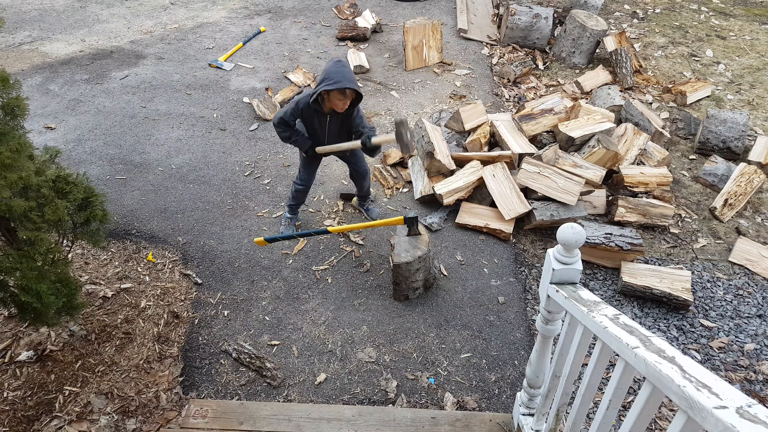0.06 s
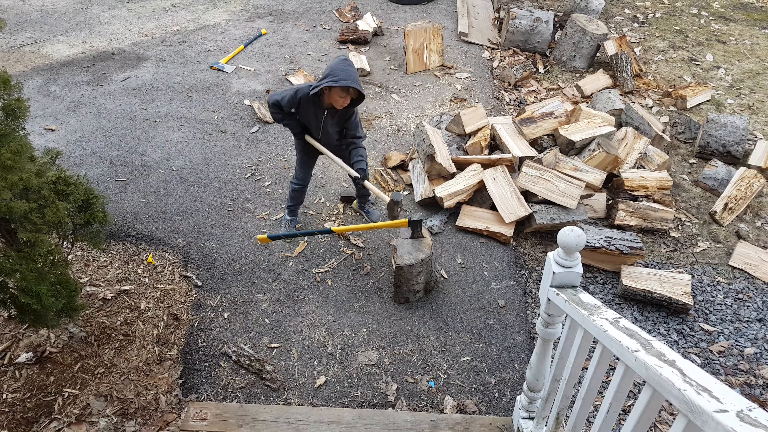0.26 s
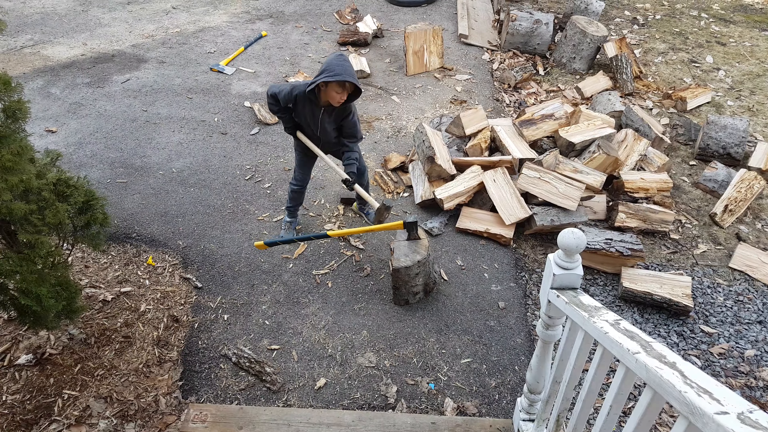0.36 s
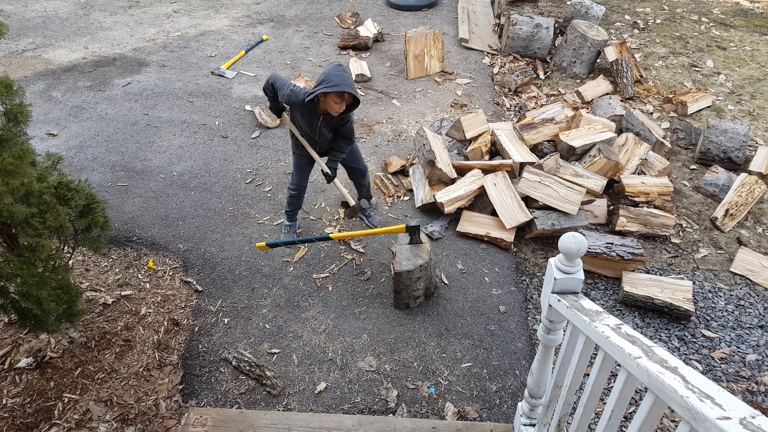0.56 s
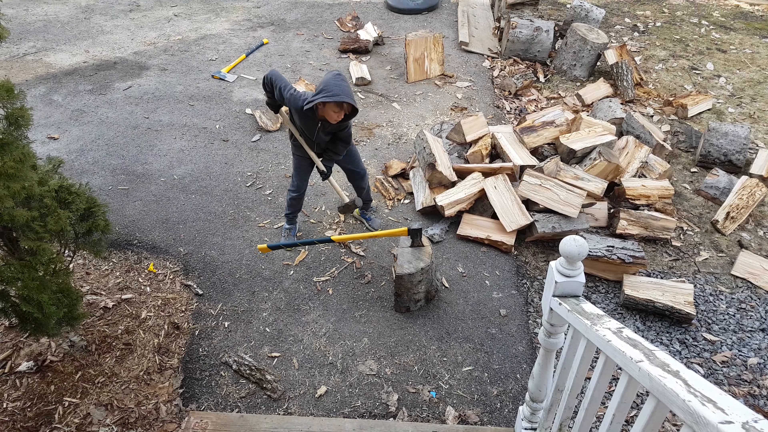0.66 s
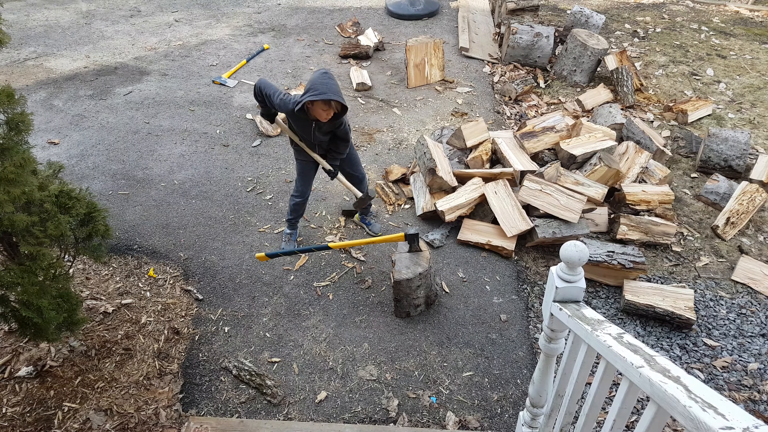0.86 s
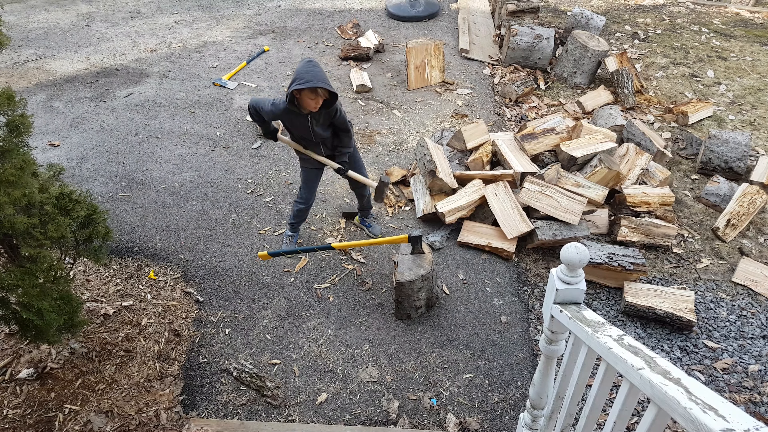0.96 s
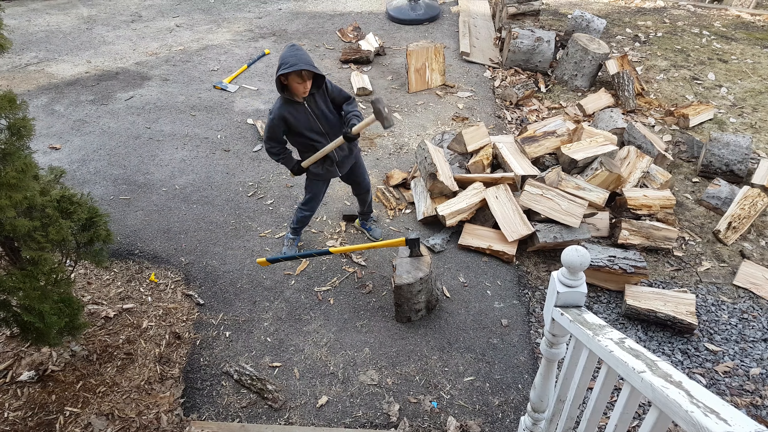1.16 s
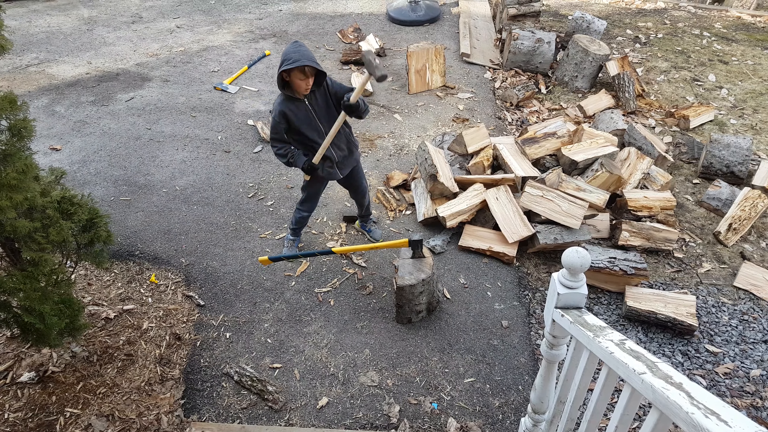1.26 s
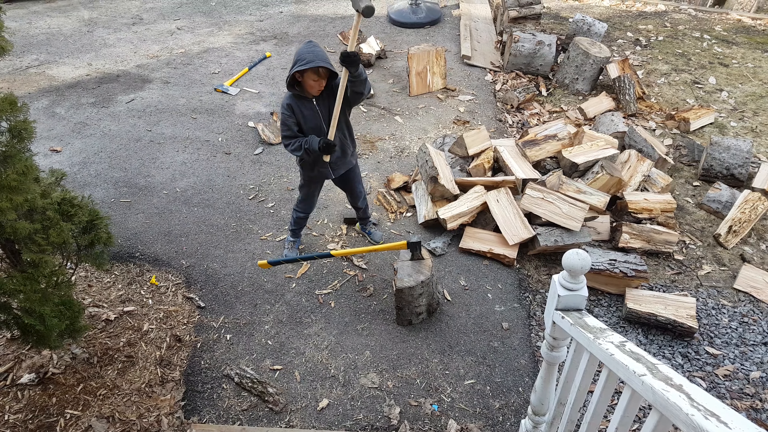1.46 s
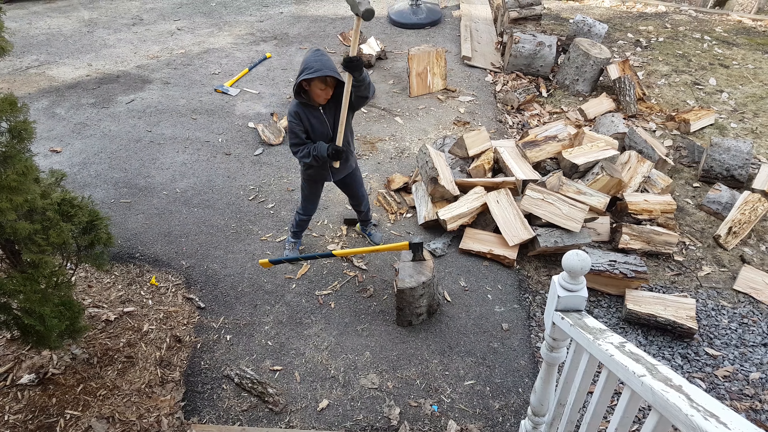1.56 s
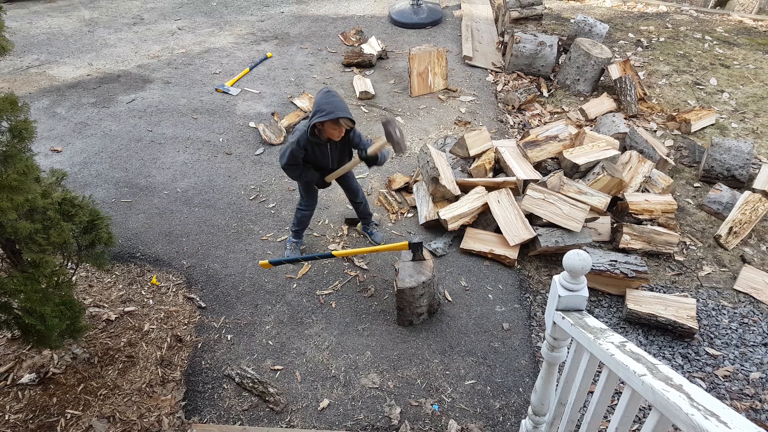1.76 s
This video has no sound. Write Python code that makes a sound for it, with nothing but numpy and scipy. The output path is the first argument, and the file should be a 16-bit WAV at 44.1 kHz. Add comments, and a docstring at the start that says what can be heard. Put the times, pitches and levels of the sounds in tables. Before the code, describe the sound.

One hard sledgehammer blow lands on a metal wedge close by in a quiet yard. The steel rings on a thin high note, the log thuds, and a faint echo fades under a few dull bumps.

```python
"""On a driveway beside a woodpile, a sledgehammer strikes a steel wedge set in a log, once.
The impact excites free vibration: the steel cracks and sings on one high note, the log thumps and clanks.
Nearby walls reflect the blow, the woodpile scatters it and the yard reverberates faintly.
A few soft bumps and ticks follow over a quiet outdoor background."""
import sys
import numpy as np
from scipy import signal
from scipy.fft import rfft, irfft, next_fast_len
from scipy.io import wavfile
from scipy.ndimage import map_coordinates

SR = 44100
rng = np.random.default_rng(int(sys.argv[2]) if len(sys.argv) > 2 else 0)


def digitize_waveform(pressure):
    """Quantize a signal to 16-bit integers and store it at the path in sys.argv[1].

    Rows of a 2-D input are taken as channels; values are limited to [-1, 1].
    """
    field = np.atleast_2d(pressure).T
    bounded = np.clip(field, -1, 1)
    quanta = np.round(bounded * 32767).astype(np.int16)
    wavfile.write(sys.argv[1], SR, quanta)


N = 79380
BLOW_S = .2094


def amp(db):
    return 10 ** (np.asarray(db) / 20)

def unit_rms(x):
    return x / np.sqrt(np.mean(x ** 2) + 1e-20)

def along(points, hz):
    """Interpolation of (f/Hz, value) points on a logarithmic frequency axis."""
    f, v = np.transpose(points)
    return np.interp(np.log(hz + 1), np.log(f + 1), v)

def envelope(points):
    """Gain per sample from (t/s, level/dB) points."""
    return amp(np.interp(np.arange(N) / SR, *np.transpose(points)))

def since(s):
    return np.maximum(np.arange(N) / SR - s, 0)

def fade(t, t60, attack_s):
    """Damping: a rise, then exponential decay by 60 dB in t60 seconds."""
    return (1 - np.exp(-t / attack_s)) * np.exp(-np.log(1000) * t / t60)

def push(s, hz, swell_s):
    """Heavily damped motion: one low push of a massive body."""
    t = since(s)
    return np.sin(2 * np.pi * hz * t) * (t / swell_s * np.exp(1 - t / swell_s)) ** 2

def wobble(rate):
    """Smooth random modulation, rate knots a second."""
    return map_coordinates(rng.standard_normal(N), [np.arange(N) * rate / SR])

def filtered(x, response):
    """Linear filtering: the spectrum of x times a frequency response."""
    m = next_fast_len(N + SR // 4)
    return irfft(rfft(x, m) * response(np.fft.rfftfreq(m, 1 / SR)), m)[..., :N]

def noise(spectrum, coherence):
    """Partial coherence: independent mid and side noise mix to coloured stereo of rms 1."""
    def response(hz):
        angle = np.arccos(np.clip(along(coherence, hz), -1, 1)) / 2
        return amp(along(spectrum, hz)) * [np.cos(angle), np.sin(angle)]
    mid, side = filtered(rng.standard_normal((2, N)), response)
    return unit_rms(np.array([mid + side, mid - side]))


# spectra of the hush and the rumble (f/Hz, relative level/dB)
HUSH_SPECTRUM = [(25, -12.5), (60, -13), (92, -6), (130, -13), (200, -10), (340, -0.5), (390, -8.5),
                 (460, -0.5), (560, -4), (850, -4), (1280, -12.5), (1520, -9), (1900, -16.5), (3600, -26),
                 (6000, -32), (9000, -36), (15000, -32.5)]
RUMBLE_SPECTRUM = [(20, -5.5), (45, -5.5), (90, 0), (250, -5.5), (500, -15), (2000, -44)]
# ducking of the hush, swell of the rumble (t/s, level/dB)
HUSH_DUCKING = [(0, -54.5), (.2, -55.5), (.5, -63.5), (.8, -62.5), (1.0, -59.5), (1.3, -57), (1.8, -57)]
RUMBLE_LEVEL = [(0, -60.5), (.06, -53.5), (.2, -62), (.42, -58.5), (.6, -67), (1.0, -77), (1.8, -74)]
# left-right likeness of both (f/Hz, coherence)
AIR_COHERENCE = [(50, .88), (200, 0.79), (350, .73), (700, .05), (1400, -0.27), (2800, .1), (5000, -.1),
                 (12000, 0)]
def background(flutter_db=-1.36):
    """Ambient noise: the hush ducks about 8 dB after the blow, as if by a recorder's gain control,
    then recovers; a low rumble swells and fades."""
    hush = envelope(HUSH_DUCKING) * amp(flutter_db * wobble(14)) * noise(HUSH_SPECTRUM, AIR_COHERENCE)
    return hush + envelope(RUMBLE_LEVEL) * noise(RUMBLE_SPECTRUM, AIR_COHERENCE)


# faint ticks (t/s, level/dB, centre f/Hz, width/octaves, T60/s)
TICK_BANDS = [(.669, -67, 14500, 0.073, 0.06), (1.569, -61.5, 14700, .08, .06),
              (1.643, -60, 2800, 0.48, 0.068), (1.655, -62, 2250, 0.12, 0.11)]
def ticks():
    """Band-limited transients: each tick is a decaying burst of narrow-band noise."""
    out = np.zeros((2, N))
    for s, db, centre_hz, octaves, t60 in TICK_BANDS:
        bell = lambda hz: np.exp(-.5 * (np.log2((hz + 1) / centre_hz) / octaves) ** 2)
        band = unit_rms(filtered(rng.standard_normal((2, N)), bell))
        out += amp(db) * band * fade(since(s), t60, attack_s=.00067)
    return out


# soft impacts (t/s, level/dB)
BUMP_EVENTS = [(.389, -36), (.433, -46.5), (0.8, -50.5), (1.002, -63.5), (1.128, -54.5)]
def bumps():
    """Damped impacts: boots and the settling hammer give dull, low pulses."""
    return sum(amp(db) * push(s, hz=212, swell_s=.003) for s, db in BUMP_EVENTS)


# spectrum of the shudder (f/Hz, relative level/dB)
SHUDDER_SPECTRUM = [(20, 0), (55, 1.5), (90, -9.5), (200, -33.5), (1000, -68.5)]
# left-right likeness of nearby sources (f/Hz, coherence)
NEAR_COHERENCE = [(150, 0.82), (1000, .92), (4000, 0.88), (12000, 0.2)]
def buffet():
    """Pressure difference: the blow jolts two microphone ports in opposite senses; a shudder follows."""
    jolt = amp(-26.5) * np.array([[1], [-1]]) * push(BLOW_S, hz=65, swell_s=.003)
    shudder = noise(SHUDDER_SPECTRUM, NEAR_COHERENCE) * fade(since(.262), t60=.36, attack_s=.008)
    return jolt + amp([[-32.5], [-34]]) * shudder  # stronger on the left


# left-right likeness of reflected sound (f/Hz, coherence)
ECHO_COHERENCE = [(40, .85), (150, 0), (350, .8), (700, 0.33), (1400, 0.033), (4000, 0), (12000, .1)]
def diffuse_field(spectrum, t60s, rise_s):
    """Absorption: dense reflections of the blow die away, each frequency at its own rate."""
    hz, t, bands = signal.stft(noise(spectrum, ECHO_COHERENCE), SR, nperseg=512)
    decay = np.exp(-np.log(1000) * np.maximum(t - BLOW_S, 0) / along(t60s, hz)[:, None])
    build_up = 1 - np.exp(-since(BLOW_S) / rise_s)
    return signal.istft(bands * decay, SR)[1][:, :N] * build_up


# spectra of the near scatter and the far echo (f/Hz, relative level/dB)
WOODPILE_SPECTRUM = [(30, -20.5), (100, -18.5), (170, -4), (300, -1.5), (380, -2.5), (450, -11.5),
                     (640, -3), (900, -5), (1300, -7), (1600, 0), (2000, -6.5), (3400, -4.5), (5000, -14.5),
                     (7000, -14), (10000, -23), (12000, -25), (15500, -21)]
YARD_SPECTRUM = [(40, -4), (250, -2), (620, -2.5), (1150, -9), (1560, -1), (2050, -9), (2400, -4.5),
                 (3000, -11), (6000, -15.5), (10000, -22), (13000, -27), (15500, -33)]
# their reverberation times (f/Hz, T60/s)
WOODPILE_DECAY = [(40, .4), (200, .25), (1000, .2), (3000, .18), (8000, .175), (15000, 0.11)]
YARD_DECAY = [(100, .7), (1500, .75), (2600, .72), (5000, 0.58), (9000, .36), (14000, .28)]
def reverberation():
    """Scattering: woodpile and driveway return the blow at once, the yard later and faintly."""
    woodpile = diffuse_field(WOODPILE_SPECTRUM, WOODPILE_DECAY, rise_s=.0078)
    yard = diffuse_field(YARD_SPECTRUM, YARD_DECAY, rise_s=.02)
    return amp(-7) * woodpile + amp(-35) * yard


# distinct echoes (delay t/s, level/dB)
WALL_ECHOES = [(.0088, -18), (0.0148, -12.5), (0.021, -15.5)]
# their spectrum (f/Hz, relative level/dB)
WALL_SPECTRUM = [(300, -8), (1000, -1), (3500, -0.5), (7000, -3.5), (10000, -15), (16000, -19.5)]
def walls():
    """Early reflection: walls and railing return short bursts, each delayed by its path."""
    out = np.zeros((2, N))
    for delay, db in WALL_ECHOES:
        burst = fade(since(BLOW_S + delay), t60=.018, attack_s=.0012)
        out += amp(db) * noise(WALL_SPECTRUM, ECHO_COHERENCE) * burst
    return out


# high modes of the steel (f/Hz)
STEEL_MODES = (8850, 8868, 8884, 8878, 13450)
# strength and damping, one row a mode (left level/dB, right level/dB, T60/s)
STEEL_DECAYS = [(-51, -42, .62), (-47, -46, .66), (-42, -50, .68), (-18, -21, .24), (-21, -24, .16)]
def steel_ring(waver_rad=.35, flutter_db=2.5, knots_per_s=85):
    """Beating: close high modes swell and interfere; the strongest die first, the rest flutter on."""
    t, ring = since(BLOW_S), np.zeros((2, N))
    for hz, (left_db, right_db, t60) in zip(STEEL_MODES, STEEL_DECAYS):
        waver = waver_rad * np.array([wobble(knots_per_s), wobble(knots_per_s)])
        tone = np.sin(2 * np.pi * hz * t + waver + rng.uniform(0, 2 * np.pi, (2, 1)))
        ring += amp([[left_db], [right_db]]) * tone * fade(t, t60, attack_s=.025)
    return ring * amp(flutter_db * wobble(knots_per_s))


# modes of log and wedge (f/Hz, relative level/dB, T60/s)
CLANK_MODES = [(217, -1.5, 0.14), (312, -9, .24), (527, 0, 0.13), (608, -7.5, 0.22), (648, -10, .2),
               (762, -14.5, .24), (1025, -1.5, .1), (1552, -10, .25), (1648, -9, 0.22), (1662, -6, 0.14),
               (2307, -8, 0.22), (3034.4, -8, 0.13), (3397, -12, .16), (4010, -15.5, .15)]
def log_and_wedge(spread_rad=.35):
    """Modal superposition: the log takes one low push and clanks with the wedge in damped modes."""
    thump = push(BLOW_S + .0025, hz=226, swell_s=.0028)
    t, clank = since(BLOW_S), np.zeros((2, N))
    for hz, db, t60 in CLANK_MODES:
        spread = spread_rad * np.log1p(hz / 527)  # higher modes differ more between the ears
        phase = rng.uniform(0, 2 * np.pi) + spread * rng.standard_normal((2, 1))
        clank += amp(db) * np.sin(2 * np.pi * hz * t + phase) * fade(t, t60, attack_s=.001)
    return amp(-1.5) * thump + amp(-14.5) * clank


# spectra of first contact and of steel on steel (f/Hz, relative level/dB)
KNOCK_SPECTRUM = [(60, -27.5), (200, -5), (500, -5.5), (1050, 1.5), (1600, -0.5), (2400, -4.5),
                  (3200, -11.5), (6000, -23), (16000, -33)]
CRACK_SPECTRUM = [(1000, -20.5), (4000, -3.5), (5500, -9.5), (7500, 5), (9000, -7.5), (10300, 0),
                  (12500, -11.5), (16000, -4)]
def hammer_contact():
    """Impulsive excitation: brief contact gives broadband sound, a blunt knock and a bright crack."""
    knock = noise(KNOCK_SPECTRUM, NEAR_COHERENCE) * fade(since(BLOW_S), t60=.05, attack_s=.00088)
    crack = noise(CRACK_SPECTRUM, NEAR_COHERENCE) * fade(since(BLOW_S + .0006), t60=.0093, attack_s=1e-4)
    return amp(-5) * knock + amp([[-4.3], [-4.7]]) * crack


def scene():
    """Superposition: the pressures of all sources and their reflections add."""
    blow = hammer_contact() + log_and_wedge() + steel_ring()
    return blow + walls() + reverberation() + buffet() + bumps() + ticks() + background()

def record(dry, ceiling=.86, cutoff_hz=15950):
    """Saturation and band limiting: the highest peaks are rounded off, then a steep low-pass acts."""
    rounded = dry / (1 + np.abs(dry / ceiling) ** 6) ** (1 / 6)
    return filtered(rounded, lambda hz: 1 / (1 + (hz / cutoff_hz) ** 160))


dry = scene()
out = record(dry)
digitize_waveform(out)
```